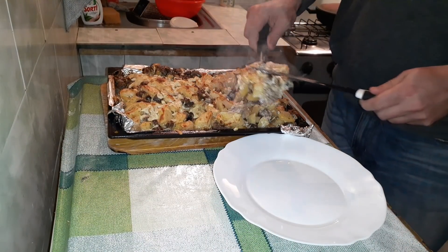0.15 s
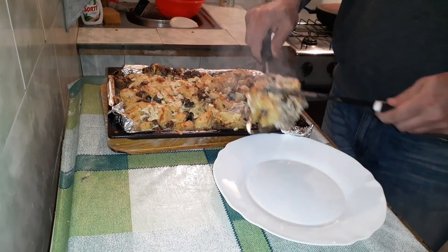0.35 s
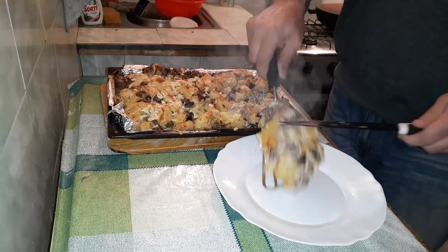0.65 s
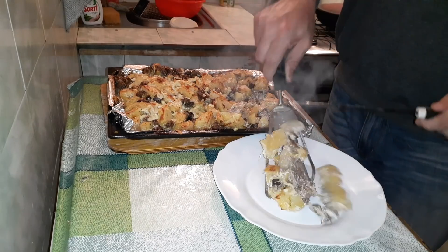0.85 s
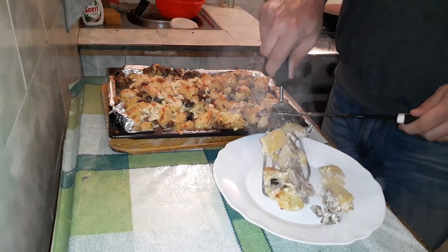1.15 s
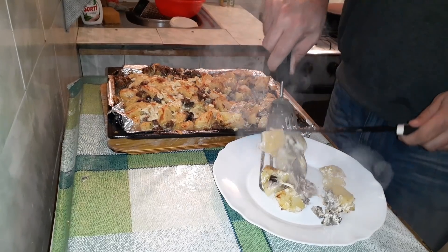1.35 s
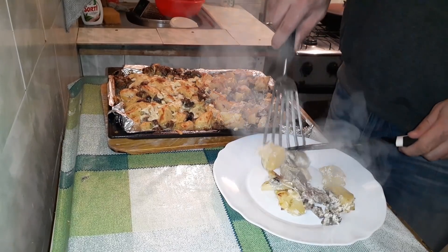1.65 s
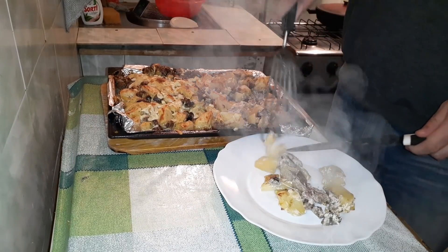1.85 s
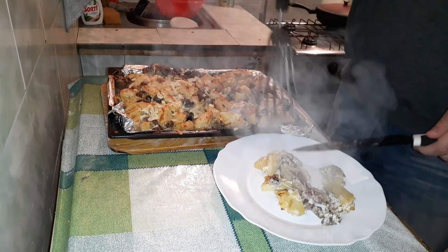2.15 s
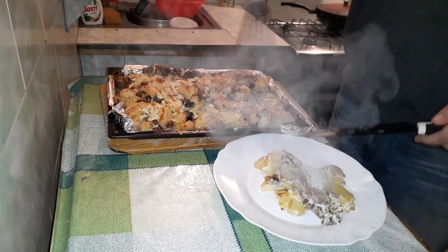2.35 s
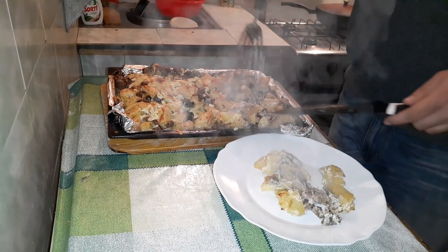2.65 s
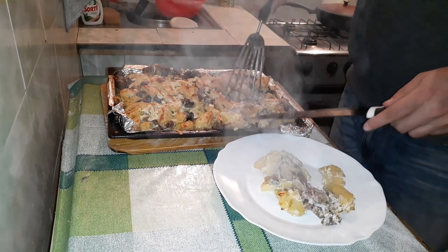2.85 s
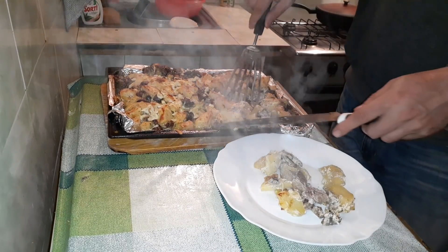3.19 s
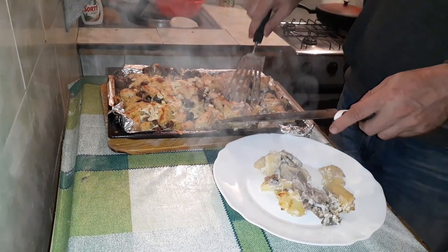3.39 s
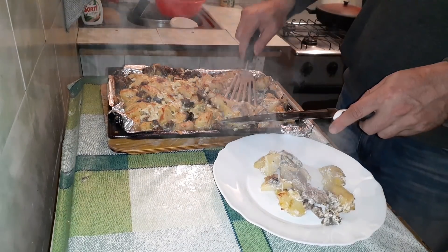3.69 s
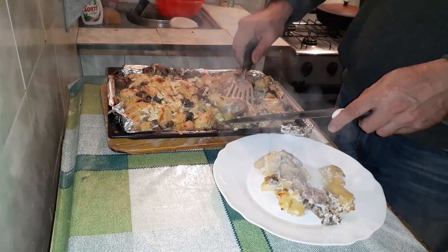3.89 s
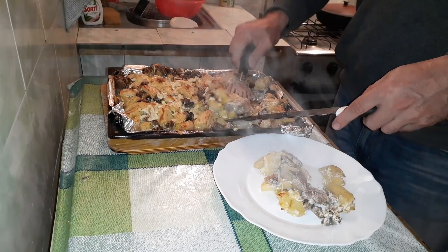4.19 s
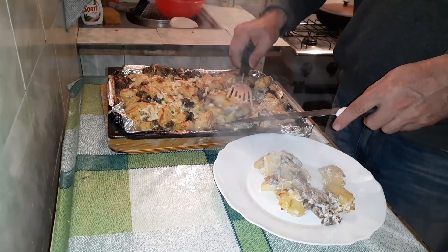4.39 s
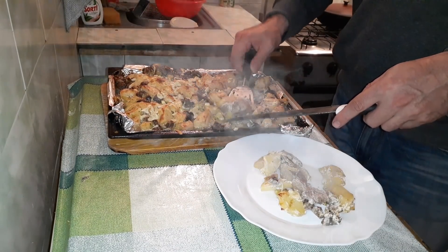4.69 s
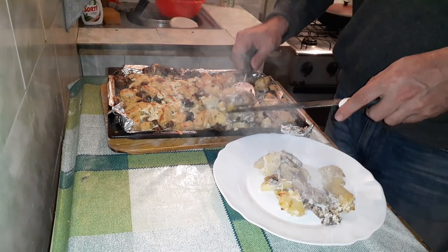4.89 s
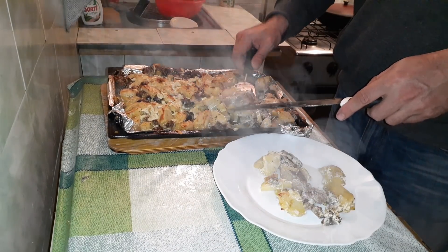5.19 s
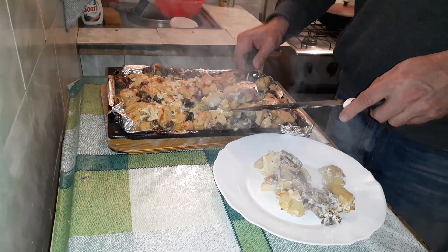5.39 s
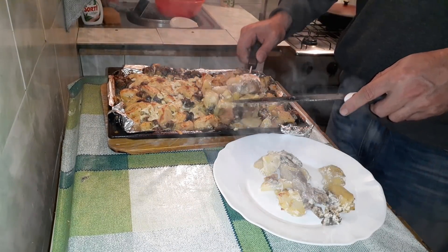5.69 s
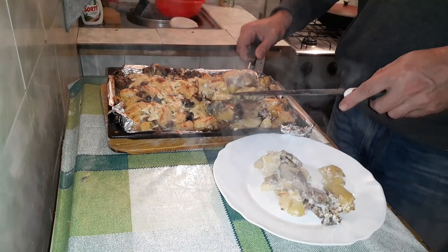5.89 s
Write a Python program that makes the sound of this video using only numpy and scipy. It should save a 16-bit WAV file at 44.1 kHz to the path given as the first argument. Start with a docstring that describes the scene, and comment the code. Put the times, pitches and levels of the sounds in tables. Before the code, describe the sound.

In a small tiled kitchen, a metal turner hits a china plate with one loud bright clink, then taps and scrapes across it in a short ringing drag. After a near-quiet gap it knocks and rubs in a thin metal tray, with foil rustling, tiny ticks and low table thumps. One crisp foil snap comes late. Close stereo microphone, light echo, faint hiss.

```python
"""A steel turner clinks on a china plate and is drawn across it, then knocks and rubs in a foil-lined tray.
Plate and tray are banks of ringing modes, excited by blows and by the grit of sliding; noise rings narrow tones.
Foil is shaped crackle plus single ticks; table and tray bottom boom low under shifting load and thuds.
Baked food is being served in a small tiled kitchen: delays echo the contacts over a faint two-sided hiss."""
import sys
import numpy as np
from scipy import signal
from scipy.fft import rfft, irfft, next_fast_len
from scipy.io import wavfile
from scipy.ndimage import uniform_filter1d

SR = 44100
rng = np.random.default_rng(int(sys.argv[2]) if len(sys.argv) > 2 else 0)


def int16_out(signal):
    """Quantize to a 16-bit WAV file."""
    q = np.round(np.clip(np.atleast_2d(signal).T, -1, 1) * 32767)
    wavfile.write(sys.argv[1], SR, q.astype(np.int16))


N = 266319

# Plate and turner ringing together. Each row: pitch in Hz, relative level in dB, undamped T60 in seconds.
PLATE_MODES = [(1461.4, -11.5, 0.1), (1490, -11.5, 0.1), (1820, -26, .06), (2398, -18, 0.16),
               (2458, -11.5, 0.27), (2540, -10, 0.17), (2590, -3, .12), (3870, -15, .08),
               (4054, -10, 0.074), (4240, -12.5, .08), (4490, -14, .1), (4925, -2, 0.14), (5470, -19, .1),
               (6370, -16, .1), (6810, -16, 0.072), (7134, -19, .08), (7530, -22, 0.074), (8320, -10, .08),
               (8820, -7, .11), (9000, -12.5, 0.11), (9330, -8.5, 0.11), (9600, -14, .07), (10826, -7, 0.1),
               (11370, -7, 0.12), (11900, -17, .06), (12380, -10, 0.09), (13100, -6.5, .1), (13660, -5, .1),
               (14430, -14.5, 0.0705), (14200, -6, 0.0913), (15000, -10.5, 0.077), (15750, -15, .08)]
# Steel on china. Each row: start in seconds, relative level in dB, brightness in dB per octave about 4 kHz.
CLINKS = [(0.7474, -9.5, -2.4), (0.873, -50.5, -13.5), (0.9427, -45, 3.5), (1.2642, -31.5, -7),
          (1.3197, -15.5, -0.5), (1.3701, -21.5, -2.5), (1.4364, -31, 5), (1.4982, -17.5, 8),
          (1.5205, -28.5, 10.5), (1.558, -27, 10)]
# Turner drawn over the plate. Each row: time in seconds, relative level in dB, edge chatter pitch in Hz.
DRAW = [(1.264, -44.5, 4330), (1.312, -35, 4490), (1.335, -32, 4470), (1.41, -35, 4200),
        (1.49, -36.5, 4000), (1.545, -38.5, 4330), (1.574, -39, 4600), (1.617, -41.5, 4820),
        (1.635, -63, 4870)]
# Baking tray. Each row: pitch in Hz, relative level in dB, T60 in seconds.
TRAY_MODES = [(530, -3.5, 0.017), (649, -14, 0.12), (865, -9, 0.025), (1230, -24, 0.31), (1337, -1, 0.057),
              (1512, -4, 0.028), (1812, -11, 0.055), (1856, 5.5, 0.01), (2094, -8.5, 0.01),
              (2284, -11, 0.043), (2573, -11, 0.068), (2930, -8.5, 0.011), (3800, -26, 0.015),
              (4310, -16, 0.034), (5150, -17, 0.052)]
# Turner against the tray. Each row: start in seconds, relative level in dB, brightness in dB per octave.
KNOCKS = [(2.947, -30, -0.5), (3.035, -38, -3), (3.098, -32.5, 1.5), (3.134, -35, -1.5)]
# Turner rubbing along the tray in jerks. Each row: peak time in seconds, relative level in dB,
# rise in seconds per 20 dB, pitch favoured by the point of contact in Hz.
RUBS = [(0, -56, .003, 1850), (2.949, -53, .003, 1600), (3.0, -60, .1, 1600), (3.04, -55.5, .03, 1400),
        (3.075, -57, .1, 1300), (3.105, -51, .03, 900), (3.135, -53, .08, 1500), (3.17, -57, .1, 1500),
        (3.48, -58.5, .065, 600), (3.58, -60.5, .12, 620), (4.41, -74.5, .01, 700), (4.55, -79, .09, 2100)]
# Tines and lightly rubbed tray singing on single narrow tones. Each row: start in seconds, length in seconds,
# pitch in Hz, level in dB before the fade in and out.
SINGS = [(3.09, .1, 12700, -74), (3.2, .1, 1310, -63.5), (3.22, 0.036, 5170, -61), (3.281, .13, 1341, -64),
         (3.309, 0.062, 3880, -70), (3.41, 0.093, 1340, -63), (3.425, 0.15, 9760, -68),
         (3.43, 0.091, 5030, -71), (3.547, 0.037, 4230, -64), (3.585, 0.32, 8300, -75),
         (3.878, .14, 11000, -64)]
# Foil and crust rustling in swells. Each row: peak time in seconds, level in dB, rise and fall in seconds
# per 20 dB, treble over the rest in dB.
RUSTLES = [(0, -45, 0.0033, 0.039, -1.5), (.06, -64.5, 0.069, 0.26, -1), (0.859, -57.5, .003, 0.23, 1.5),
           (2.949, -54, .003, .2, -5), (3.05, -56.5, .05, .15, -5), (3.15, -52.5, 0.2, 0.077, -5.5),
           (3.238, -56.5, 0.037, 0.067, 3), (3.34, -63, .1, 0.11, -1), (3.49, -58, 0.12, 0.36, -6),
           (3.57, -58, 0.12, 0.21, -1.5), (3.93, -57, 0.31, 0.23, 4), (4.551, -58, 0.2, 0.11, -1.5),
           (4.86, -64.5, 0.25, 0.12, 4), (5.086, -48.5, 0.0073, 0.066, 2.5), (5.619, -71, 0.0032, .15, 11),
           (5.75, -71.5, 0.44, 0.12, 7.5), (6.0, -66, 0.038, 0.026, 8)]
# Rustle spectrum. Each row: frequency in Hz, relative density in dB per Hz.
RUSTLE_COLOUR = [(880, -50), (1500, -6), (2040, -1.5), (2370, -1.5), (3550, -10.5), (4920, 0.5),
                 (6830, -16), (8740, -2.5), (12700, 0.5), (16000, -16)]
# Single ticks of foil and steel. Each row: start in seconds, peak in dB before panning, centre in Hz,
# left over right in dB.
TICKS = [(0.0966, -43, 6450, -2), (0.897, -44, 12700, 16), (0.987, -46, 11400, 4), (1.646, -43, 12000, -1),
         (1.706, -42.5, 11950, -1), (2.8545, -52, 11300, 4), (2.968, -59, 12500, 3), (3.043, -46, 14000, 5),
         (3.229, -45.5, 9500, 3), (3.484, -45, 8760, 6), (3.575, -50, 12500, 1), (3.743, -66, 8490, 3),
         (3.955, -45, 10900, 10.5), (4.472, -49, 8600, 5), (4.5216, -46.5, 8350, 9), (4.755, -41, 12700, 0),
         (4.788, -46.5, 9250, -4), (4.792, -53.5, 2600, 0), (4.805, -47, 8050, -1), (4.842, -41.5, 9700, 1),
         (5.084, -25.5, 6670, 0), (5.4420, -53, 11300, 0), (5.6195, -45.5, 9400, -4.5),
         (5.9887, -51.5, 8250, 5)]
# Table and tray bottom. Each row: pitch in Hz, T60 in seconds.
TABLE_MODES = [(70, 0.45), (120, 0.24), (156, 0.29), (183, 0.17), (209, 0.13), (255, 0.13), (310, 0.028),
               (345, 0.023), (420, 0.95)]
# Cook leaning on tray and plate. Each row: peak time in seconds, relative level in dB, rise and fall in
# seconds per 20 dB, pitch favoured by where the load bears in Hz.
LOADS = [(.77, -59, 0.1, 0.079, 277), (.93, -58.5, 0.13, 0.23, 183), (1.549, -66, 1, 0.36, 290),
         (1.849, -70, 0.87, 0.33, 156), (2.57, -71.5, 0.58, 0.37, 270), (2.965, -57.5, 0.013, 0.86, 248),
         (3.13, -46, 0.1, 0.14, 255), (3.201, -54.5, 0.11, 0.17, 174), (3.55, -60.5, 0.21, 0.35, 284),
         (3.8, -69.5, 0.27, 0.5, 287), (4.6, -74, 0.39, 0.78, 286), (5.3, -75, 0.94, 1.6, 250)]
# Things set down or nudged. Each row: start in seconds, relative level in dB, centre in Hz, contact in seconds.
THUDS = [(0.877, -41, 147, 0.018), (1.736, -63, 159, 0.058), (2.27, -40.5, 330, 0.083),
         (3.095, -32, 308.7, 0.02), (3.7, -48, 382, 0.058), (3.811, -30, 330.6, 0.13),
         (4.14, -45, 350, 0.114), (4.691, -39.5, 335, 0.11), (5.441, -45.5, 283, 0.1),
         (5.75, -46.5, 306.5, 0.092)]
# Hiss spectrum. Each row: frequency in Hz, relative density in dB per Hz.
HISS_COLOUR = [(18, -46), (30, -8), (153, -2.5), (221, -2.5), (266, -2.5), (336, -4.5), (461, -7),
               (554, -6.5), (937, -9), (3060, -15), (6900, -24), (13700, -15), (16000, -23)]
# Left-right likeness of the hiss. Each row: frequency in Hz, correlation from -1 to 1.
HISS_LIKENESS = [(60, 0.24), (180, -0.045), (550, -0.15), (1650, -0.17), (4970, -0.095), (15000, -0.1)]

PLATE_HEARD_UNTIL_S, TRAY_HEARD_UNTIL_S = 2.2, 5.0
# the draw thins out towards the rim
DRAW_START_DB_PER_OCTAVE, DRAW_BRIGHTENS_DB_PER_OCTAVE_S = -2, 32
# modes this close to the edge's pitch are driven harder
NEAR_DB, NEAR_OCTAVES = 7.5, .07
# pressed plate rings die this many times faster at 4 kHz, growing as this power of pitch
PRESSED_DAMPING, DAMPING_POWER = 2.6, .45
RUB_FALL_S_PER_20_DB = 0.067
# rub drive lost one octave off the favoured pitch; far more in a rub lighter than FIRM_DB
FIRM_DB, FIRM_LOSS_DB, LIGHT_LOSS_DB = -61, 6, 73
SING_T60_AT_5_KHZ_S = 0.015
TREBLE_FROM_HZ = 7800
TICK_T60_S = 0.013
# after the loudest tick the foil shivers on
SHIVER_DB, SHIVER_HZ, SHIVER_T60_S = -39.5, 5230, 0.26
# what is set down rocks while in contact
ROCK_HZ, ROCK_DEPTH = 45, 1.1
KITCHEN_T60_S, KITCHEN_DB = 0.21, -14.5
WALL_HALF_T60_HZ = 18000
HISS_DB = -66.5
LOW_CUT_HZ, CUTOFF_HZ = 56, 15780


def from_db(db):
    """Decibels to gain."""
    return 10 ** (np.asarray(db) / 20)


def rms_one(x):
    """Scales to unit rms."""
    return x / np.sqrt(np.mean(x ** 2) + 1e-20)


def sides(pan_db):
    """Left and right gains, pan_db apart."""
    return from_db([[pan_db / 2], [-pan_db / 2]])


def filtered(x, order, hz, kind):
    """Butterworth filter."""
    return signal.sosfilt(signal.butter(order, hz, kind, fs=SR, output="sos"), x)


def in_time(stroke):
    """Level of a stroke sample by sample, -120 dB before and after."""
    before, after = (stroke[0][0] - .01, -120), (stroke[-1][0] + .03, -120)
    s, level_db = np.transpose([before, *[row[:2] for row in stroke], after])
    return np.interp(np.arange(N) / SR, s, level_db)


def swells(s, level_db, rise_s, fall_s):
    """Each swell climbs to its peak and sinks in straight dB; gives the level and which is loudest."""
    late_s = np.arange(0, N, 16)[:, None] / SR - s
    each_db = level_db - 20 * np.maximum(late_s / fall_s, -late_s / rise_s)
    return np.repeat(each_db.max(axis=1), 16)[:N], np.repeat(each_db.argmax(axis=1), 16)[:N]


def at_hz(points, hz):
    """Reads a spectrum on a log axis."""
    point_hz, value = np.array(points)[:, :2].T
    return np.interp(np.log(hz), np.log(point_hz), value)


def grit(per_s, spread_db):
    """Slips of a rough contact: random clicks of uneven size, rms 1."""
    size = from_db(spread_db * np.minimum(rng.exponential(1, N), 5)) * rng.choice([-1, 1], N)
    return rms_one(size * (rng.random(N) < per_s / SR))


def ring(clicks, hz, t60_s, turn_rad=0.):
    """A unit click rings a decaying sine of height 1, its phase turn_rad apart between the sides."""
    r, w = from_db(-60 / (t60_s * SR)), 2 * np.pi * hz / SR
    raw = signal.lfilter([1], [1, -2 * r * np.cos(w), r * r], clicks + 1e-18)
    late = np.r_[0, raw[:-1]] * r
    return np.array([np.sin(p) * raw + np.sin(w - p) * late for p in (turn_rad / 2, -turn_rad / 2)])


def noise_drive_gain(t60_s):
    """Gain that lets a noise-driven ring keep the drive's rms."""
    return np.sqrt(4 * np.log(1000) / (t60_s * SR))


def slow_waver(shape, size):
    """Noise smoothed twice, rms 1."""
    return rms_one(uniform_filter1d(uniform_filter1d(rng.standard_normal(shape), size=size), size=size))


def struck(modes, blows, blow_db, drive, contact_s, rattle, pressed_from_s, damping, until_s):
    """Blows and a rubbing drive(hz) excite one set of modes, damped once the turner presses on the body."""
    s, peak_db, tilt_db = np.transpose(blows)
    at, out, n = np.round(s * SR).astype(int), 0, round(until_s * SR)
    luck_db = rng.normal(0, 2.5, (len(s), len(modes)))  # each blow weighs the modes anew
    shake = slow_waver((2, n), 300)
    travel = slow_waver(n, 1500)
    pressed = np.arange(n) > pressed_from_s * SR
    for k, (hz, level_db, t60_s) in enumerate(modes):
        turn_rad = 1.3 * (-1) ** k  # each mode radiates its own pattern
        hit = np.zeros(n)
        hit[at] = from_db(peak_db + blow_db + tilt_db * np.log2(hz / 4000) + luck_db[:, k])
        # the ring builds up while the contact lasts
        push = ring(hit, hz, contact_s)[0] * 2 * np.log(1000) / (contact_s * SR)
        held_t60_s = t60_s / damping(hz)
        rub = drive(hz)[:n] * noise_drive_gain(held_t60_s)
        # sliding across nodes and bellies evens the modes out
        rub = rub * from_db(3.5 * np.roll(travel, 7001 * k) - level_db / 2)
        # loose contact makes every mode waver in its own way
        uneven = 1 + rattle * np.roll(shake, 5003 * k, axis=1)
        free = ring(push * ~pressed, hz, t60_s, turn_rad)
        held = ring(push * pressed + rub, hz, held_t60_s, turn_rad)
        out = out + from_db(level_db) * (free + held) * uneven
    return np.pad(out, [(0, 0), (0, N - n)])


def banded(spectrum, white, likeness):
    """Half-octave bands of two noise pairs, each with its own level and left-right likeness; rms 1."""
    out, edges = 0, 30 * 2 ** np.arange(0, 9.6, .5)
    for k, (low, high) in enumerate(zip(edges, np.minimum(edges[1:], 20000))):
        centre_hz = np.sqrt(low * high)
        mid, side = filtered(white[k % 2], 2, [low, high], "band")
        alike = np.clip(at_hz(likeness, centre_hz), -1, 1)
        pair = np.sqrt(1 + alike) * mid + np.sqrt(1 - alike) * side * [[1], [-1]]
        out = out + from_db(at_hz(spectrum, centre_hz)) * pair
    return rms_one(out)


def clink_crack():
    """Each clink adds a short burst of high noise."""
    crack = np.zeros(N)
    crack[[round(s * SR) for s, *_ in CLINKS]] = from_db(np.array(CLINKS)[:, 1] - 9.0)
    crack = signal.lfilter([1], [1, -from_db(-60 / (.05 * SR))], crack)  # T60 .05 s
    crack = uniform_filter1d(crack, size=60, origin=29)  # softens the onset
    return filtered(crack * rng.standard_normal((2, N)), 2, 3300.0, "high")


def plate():
    """Clinks and the long draw ring the china; the bare friction hiss is heard beside the modes."""
    t = np.arange(N) / SR
    drawn_s = np.clip(t - DRAW[0][0], 0, DRAW[-1][0] - DRAW[0][0])
    tilt_db = DRAW_START_DB_PER_OCTAVE + DRAW_BRIGHTENS_DB_PER_OCTAVE_S * drawn_s
    catch = rms_one(uniform_filter1d(rng.standard_normal(N), size=200))
    level_db = in_time(DRAW) + 1.6 * catch  # the edge catches unevenly
    edge_hz = np.interp(t, *np.transpose(DRAW)[::2])
    slips = grit(per_s=7300.0, spread_db=4.5)

    def drive(hz):
        """Slips push hardest on modes near the edge's chatter pitch."""
        near_db = NEAR_DB * np.exp(-(np.log2(hz / edge_hz) / NEAR_OCTAVES) ** 2)
        return slips * from_db(level_db - 19.5 + tilt_db * np.log2(hz / 4000) + near_db)

    def damping(hz):
        """Pressed rings die faster with rising pitch."""
        return PRESSED_DAMPING * (hz / 4000) ** DAMPING_POWER

    rings = struck(PLATE_MODES, CLINKS, -14.5, drive, contact_s=0.0051, rattle=1.0,
                   pressed_from_s=1.2, damping=damping, until_s=PLATE_HEARD_UNTIL_S)
    rasp = np.array([grit(per_s=11000.0, spread_db=0.5) for side in (0, 1)])
    friction = from_db(level_db + 3.3) * filtered(rasp, 3, 9000.0, "high")
    # too small a body to radiate bass
    return filtered(rings + friction + clink_crack(), 8, 1250.0, "high") * sides(1.3)


def tray():
    """Knocks and rubbing ring the sheet metal; the contact point favours modes near one pitch."""
    s, peak_db, rise_s, contact_hz = np.transpose(RUBS)
    level_db, which = swells(s, peak_db, rise_s, RUB_FALL_S_PER_20_DB)
    centre_hz = contact_hz[which]
    loss_db = np.where(peak_db < FIRM_DB, LIGHT_LOSS_DB, FIRM_LOSS_DB)[which]
    slips = grit(per_s=2500.0, spread_db=2.5)

    def drive(hz):
        """Slips weaken with squared distance in octaves from the favoured pitch."""
        return slips * from_db(level_db - loss_db * np.log2(hz / centre_hz) ** 2)

    rings = struck(TRAY_MODES, KNOCKS, -8.5, drive, contact_s=0.008, rattle=0.71,
                   pressed_from_s=0, damping=lambda hz: 1, until_s=TRAY_HEARD_UNTIL_S)
    return rings * sides(1.0)


def narrow_tones():
    """Noise rings one short mode for each singing of tine or lightly rubbed tray; lower tones ring longer."""
    out = np.zeros((2, N))
    noises = rng.standard_normal((len(SINGS), 16000))
    for (s, length_s, hz, level_db), noise in zip(SINGS, noises):
        at, size = round(s * SR), round(length_s * SR)
        t60_s = SING_T60_AT_5_KHZ_S * np.sqrt(5000 / hz)
        tone = rms_one(ring(noise[:size], hz, t60_s, turn_rad=1.35))
        out[:, at:at + size] += from_db(level_db) * np.hanning(size) * tone
    return out


def foil_bed():
    """A dense bed of tiny creases swells and leans towards treble or away from it."""
    white = np.array([[grit(per_s=7400.0, spread_db=3.0) for side in (0, 1)] for pair in (0, 1)])
    bed = banded(RUSTLE_COLOUR, white, [(1000, 0.077), (16000, 0.03)])
    *shape, treble_db = np.transpose(RUSTLES)
    level_db, which = swells(*shape)
    lean = from_db(uniform_filter1d(treble_db[which], size=900) / 2)
    low, high = (filtered(bed, 4, TREBLE_FROM_HZ, kind) for kind in ("low", "high"))
    return from_db(level_db) * (low / lean + high * lean)


def foil_ticks():
    """Single ticks and one shiver, each a decaying noise burst about its own pitch."""
    out = np.zeros((2, N))
    loudest_s = max(TICKS, key=lambda row: row[1])[0]
    bursts = [(*row, TICK_T60_S) for row in TICKS]
    bursts.append((loudest_s, SHIVER_DB, SHIVER_HZ, -1.5, SHIVER_T60_S))
    noises = rng.standard_normal((len(bursts), 2, 8000))
    for (s, peak_db, hz, pan_db, t60_s), noise in zip(bursts, noises):
        width = 1.25 + .004 / t60_s  # the shorter the tick, the wider its band
        decay = from_db(-60 * np.arange(8000) / (t60_s * SR))
        # noise[0] on both sides keeps them partly alike
        tick = filtered((noise[0] + noise) * decay, 2, [hz / width, min(hz * width, 19000)], "band")
        tick = from_db(peak_db) * sides(pan_db) * tick / np.abs(tick).max()
        at = round(s * SR)
        out[:, at:at + 8000] += tick[:, :N - at]
    return out


def thud_press(thud_hz, contact_s):
    """Force of a thing set down: the contact yields, swings and rocks."""
    size = round(contact_s * SR)
    t = np.arange(size) / SR
    press = np.hanning(size) * (np.sin(2 * np.pi * thud_hz * t) + 0.43) * 4 / size
    return press * (1 + ROCK_DEPTH * np.cos(2 * np.pi * ROCK_HZ * (t - contact_s / 2)))


def table():
    """Shifting load and soft thuds set the low modes booming."""
    *shape, bearing_hz = np.transpose(LOADS)
    level_db, which = swells(*shape)
    centre_hz = bearing_hz[which]
    push, out = rng.standard_normal(N), 0
    for hz, t60_s in TABLE_MODES:
        favour_db = -30.4 * np.log2(hz / centre_hz) ** 2
        force = push * from_db(level_db + favour_db) * noise_drive_gain(t60_s)
        for s, peak_db, thud_hz, contact_s in THUDS:
            press = thud_press(thud_hz, contact_s)
            at = round(s * SR)
            thud_db = peak_db - 3.0 - 5 * np.log2(hz / thud_hz) ** 2
            force[at:at + len(press)] += from_db(thud_db) * press
        # only motion radiates
        moving = np.gradient(uniform_filter1d(force, size=40)) * SR / (2 * np.pi * hz)
        out = out + ring(moving, hz, t60_s, turn_rad=hz / 770.0) * sides(hz / 60.0)
    return out


def kitchen(x):
    """Twelve feedback delays a side, duller on every round, summed on a frequency grid."""
    size = next_fast_len(N + SR)
    w = 2 * np.pi * np.arange(size // 2 + 1) / size
    t60_s = KITCHEN_T60_S / (1 + (w * SR / (2 * np.pi * WALL_HALF_T60_HZ)) ** 2)
    walls = np.zeros((2, len(w)), complex)
    lags = (rng.uniform(.009, .032, size=24) * SR).astype(int)
    for k, lag in enumerate(lags):
        loop = from_db(-60 * lag / SR / t60_s) * np.exp(-1j * w * lag)
        walls[k % 2] += loop / (1 - loop) * (-1) ** (k // 2)
    return irfft(walls * rfft(x, size), size)[:, :N]


def hiss():
    """Steady microphone noise, its left-right likeness set band by band."""
    return from_db(HISS_DB) * banded(HISS_COLOUR, rng.standard_normal((2, 2, N)), HISS_LIKENESS)


def scene():
    """All contacts, the kitchen's echo of all but the table, and the steady hiss."""
    near = plate() + tray() + narrow_tones() + foil_bed() + foil_ticks()
    return near + from_db(KITCHEN_DB) * kitchen(near) + table() + hiss()


def record(dry):
    """The microphones drop the deepest bass; the top is cut steeply."""
    thin = filtered(dry, 3, LOW_CUT_HZ, "high")
    return signal.sosfilt(signal.ellip(12, .5, 70, CUTOFF_HZ, fs=SR, output="sos"), thin)


dry = scene()
out = record(dry)
int16_out(out)
```